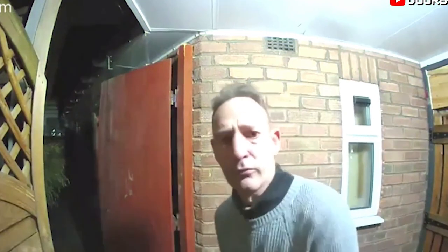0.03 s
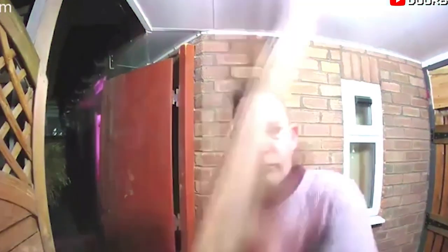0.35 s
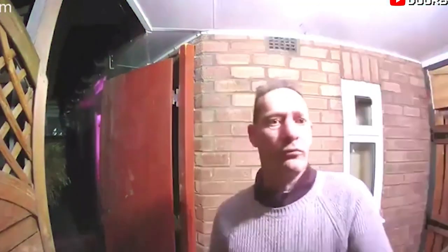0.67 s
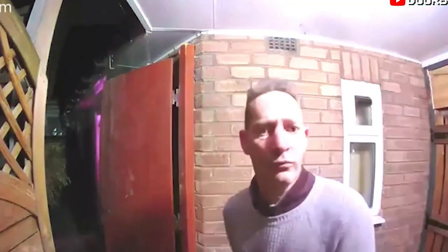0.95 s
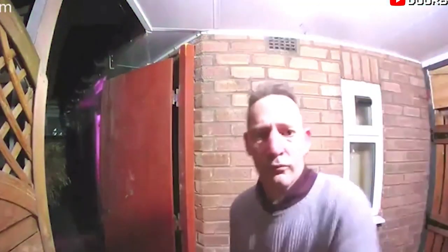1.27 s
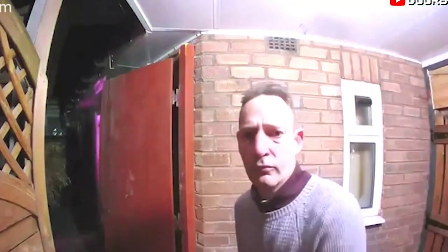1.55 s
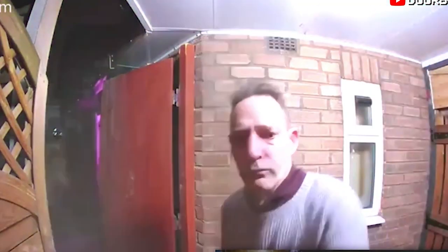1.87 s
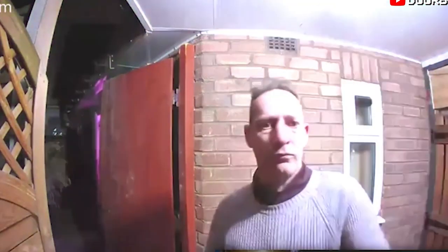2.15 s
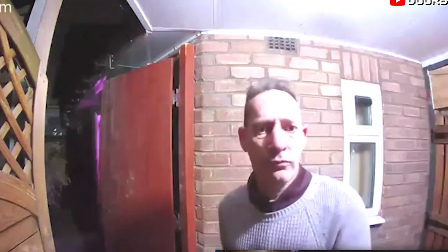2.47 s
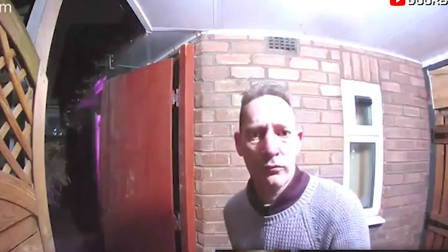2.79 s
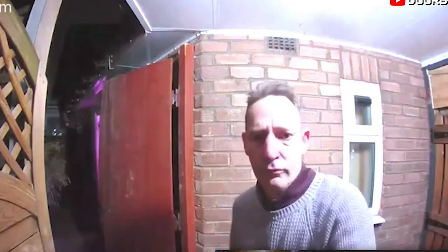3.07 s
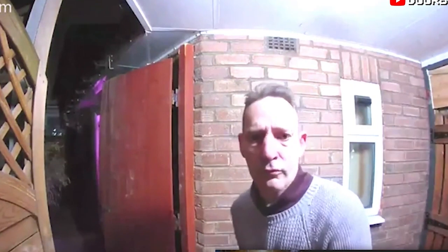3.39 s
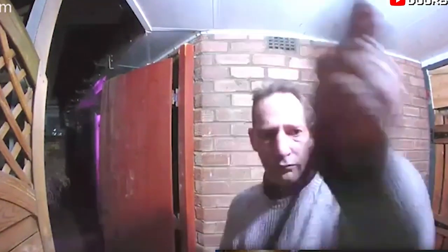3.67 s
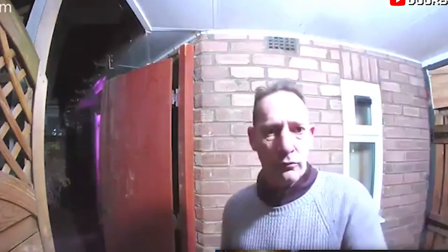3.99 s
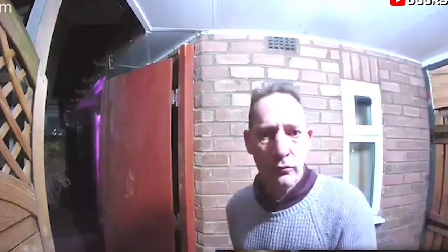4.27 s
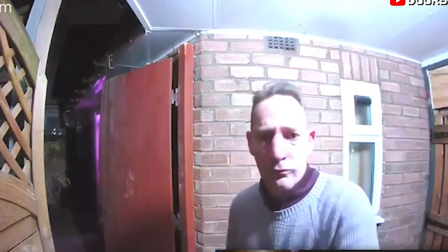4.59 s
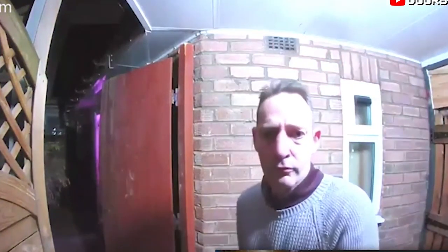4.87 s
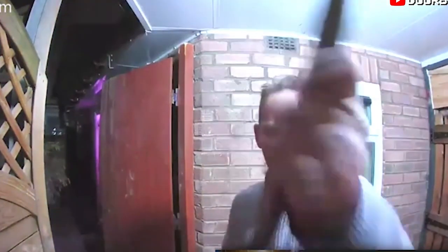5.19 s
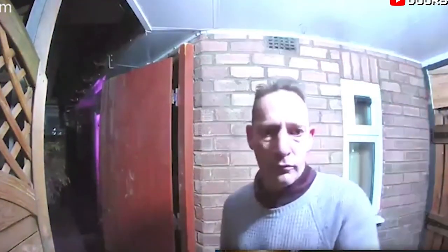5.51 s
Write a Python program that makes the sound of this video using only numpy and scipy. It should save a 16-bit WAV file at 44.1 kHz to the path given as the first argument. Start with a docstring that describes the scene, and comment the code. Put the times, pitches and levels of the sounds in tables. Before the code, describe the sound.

A hand strikes a doorbell camera seven times at uneven intervals on an outdoor porch. Each blow is a sharp plastic knock with a short ring from the mount, and some add a low panel thud. Between blows the loose housing clicks, the hand scrapes and raps, a small metal part buzzes and a sleeve swishes softly. The microphone sits inside the housing and overloads on the hits, over a faint hiss.

```python
"""A man's hand strikes a doorbell camera seven times, under a brick porch at night.
Each blow swings the plastic housing, rings its mount and overloads the tiny microphone inside.
Heavy blows make the panel behind it thud, and a small metal part buzzes when shaken.
Between blows the loose housing clicks, his hand scrapes and raps on it, and his sleeve swishes
over a faint outdoor hiss."""
import sys
import numpy as np
from scipy import signal
from scipy.fft import rfft, irfft, next_fast_len
from scipy.io import wavfile
from scipy.ndimage import uniform_filter1d

SR = 44100
rng = np.random.default_rng(int(sys.argv[2]) if len(sys.argv) > 2 else 0)


def pcm_store(signal):
    """Save signal as 16-bit PCM."""
    levels = np.round(np.clip(np.atleast_2d(signal), -1, 1) * 32767)
    wavfile.write(sys.argv[1], SR, levels.astype(np.int16).T)


N = 249165
T = np.arange(round(.7 * SR)) / SR  # seconds since the start of one short sound

# A mode is one tone an object rings with. decay_s is the time a sound takes to fade by 60 dB.
# A spot is the place touched on the housing; spot_hz is the pitch that place brings out.

# tone of the outdoor hiss: pitch_hz, level_db
NIGHT_TONE = [(15, -48.5), (25, -22), (38, -13), (146, -4), (255, -7), (285, -6), (319, -9), (436, -9),
              (487, -7.5), (533, -9.5), (652, -11), (1040, -11), (2490, -26), (4650, -18), (5200, -27.5),
              (6760, -55), (11400, -120)]
# the sleeve swings past: middle_s, level_db
SLEEVE_SWISHES = [(0.04, -49), (0.235, -39), (1.39, -31), (1.775, -40), (1.98, -41), (2.06, -39),
                  (2.815, -49.5), (3.11, -45), (3.43, -48), (4.19, -48), (4.375, -39), (5.01, -39.5)]
# tone of the sleeve: pitch_hz, level_db
SLEEVE_TONE = [(200, -4), (900, -7), (2000, -15.5), (3000, -5), (3700, -4.5), (4500, 3), (5200, -9.5),
               (6500, -16.5)]
# clicks of the loose housing: start_s, level_db, spot_hz
HOUSING_CLICKS = [ (0.164, -34.5, 2800), (0.204, -30.5, 3020), (0.4456, -2.5, 900), (0.4738, -13, 3860),
                  (0.5051, -8.5, 1290), (0.5235, -9, 1400), (0.5636, -10, 3500), (1.166, -18, 4040),
                  (2.902, -3, 4060), (3.014, -1, 1550), (3.033, -11, 2780), (3.0406, 1.5, 1600),
                  (3.0441, -0.5, 860), (3.157, -25.5, 1730), (3.213, -33, 2800), (3.41, -31, 2600),
                  (4.468, 1, 3930), (4.5169, -4.5, 830), (4.5567, -1.5, 1580), (4.5635, 1.5, 850),
                  (4.5744, -5.5, 862), (4.642, -27, 4100), (4.656, -23, 4130), (4.6750, -11, 4050),
                  (4.737, -33, 4480), (4.7586, -11.5, 3420), (4.7609, -11, 1620)]
# modes of the housing's plastic shell: pitch_hz, level_db, decay_s
SHELL_MODES = [(810, 0, 0.0083), (945, -8, 0.023), (1550, -6.5, 0.013), (1653, -6.5, 0.018),
               (2106, -4.5, 0.013), (2800, -4.5, 0.01), (3420, -8, 0.028), (4390, 0, 0.006),
               (4480, 1.5, 0.0087), (4900, -7.5, 0.0098)]
# tone of the porch echo, also used for the snap of a click: pitch_hz, level_db
PORCH_TONE = [(150, -14.5), (800, 7.5), (2500, -7), (4400, -1.5), (5500, -4), (9000, -9.5)]
# the hand lands; the housing rocks and its face flexes, at pitches set by the grip:
# start_s, weight_db, hardness_db, thump_db, mount_db, decay_s, rock_hz, rock_db, flex_hz, flex_db
HAND_BLOWS = [ (0.2824, -9.5, -5, -16.5, -11.5, 0.31, 432, -9, 787, -4),
              (1.2380, -7.5, -16.5, -23, -6, 0.35, 289, 4, 1102, 2.5),
              (1.8400, -3, -9, -7, -15, 0.16, 458, 12.5, 754, 13),
              (2.8661, -7.5, -12, -11, -8, 0.31, 387.3, 11.5, 700, -11.5),
              (2.8870, -20.5, -13, -39.5, -29, 0.17, 300, -13.5, 782, 15),
              (3.4890, -9.5, -11, -23, -11, 0.24, 448.4, 14, 749, 8.5),
              (4.4217, -11, -7.5, -20, -7.5, 0.31, 293, -4.5, 752, -0.5),
              (5.0620, -16.5, -8, -22, -13, 0.24, 402, 5.5, 706, 3.5),
              (5.0840, -16, -27.5, -31, -14, 0.13, 399, -3.5, 756, -12.5)]
# tone of the clatter after a blow: pitch_hz, level_db
CLATTER_TONE = [(40, -25), (80, -14.5), (130, -10), (170, -2), (205, -6), (300, 2.5), (460, -2), (600, -4),
                (800, -3), (1100, -2), (1500, -5.5), (2600, -10), (4400, -4), (5500, -14.5), (7000, -10),
                (11000, -9)]
# pitch ranges of the clatter, starting with the palm's thump: low_hz, high_hz
CLATTER_BANDS = [(45, 130), (130, 600), (600, 1500), (1500, 3300), (3300, 11000)]
# what drives each range above the thump (hardness sets the rest): level_db, weight_share
BAND_DRIVE = [(-1.5, 1), (1, 0.68), (-2.5, 0.26), (3.5, 0.22)]
# modes of the mount: pitch_hz, level_db, decay_s
MOUNT_MODES = [(296.3, -9, 0.34), (316, 0.5, 0.27), (399.2, -5, 0.3), (444, -5, 0.22), (751.7, -0.5, 0.11),
               (871, -12.5, 0.2), (1022, -17, 0.29), (1040, -22.5, 0.076), (4070, -16, .14),
               (4290, -21, 0.093)]
# the panel hits its frame: start_s, level_db
PANEL_THUDS = [(0.340, -16.5), (1.28, -7), (2.911, -3.5), (4.475, -8.5)]
# modes of the panel: pitch_hz, level_db, decay_s
PANEL_MODES = [(172.9, -4.5, 0.24), (200, -7.5, 0.12), (261.6, -7, 0.26), (335, -1.5, 0.1)]
# the hand drags on the housing: spot_hz, list of (time_s, level_db)
HAND_SCRAPES = [(1300, [(0.43, -38), (0.465, -25.5), (0.50, -33), (0.53, -28.5), (0.578, -26.5)]),
                (4450, [(4.52, -28.5), (4.535, -19.5), (4.56, -13), (4.59, -17.5), (4.615, -23),
                (4.628, -41)])]
# light knuckle raps: start_s, hardness_db, decay_s, flex_hz, flex_db
KNUCKLE_RAPS = [(0.5796, -6.5, .12, 1928, 0.5), (0.5971, -16, 0.29, 1927, -4.5),
                (1.1298, -16, 0.37, 2972, 1.5)]
# the small metal part is shaken: start_s, level_db, decay_s
METAL_BUZZES = [(1.13, -6, 0.09), (1.149, -17, 0.34), (1.416, -28, 0.12), (1.485, -33.5, 0.13)]
# modes of the metal part: pitch_hz, level_db, decay_s
METAL_MODES = [(2890, -7.5, 0.095), (2970, -6, 0.12), (3030, -12.5, 0.045), (3070, -6.5, 0.047),
               (3040, -5, 0.01), (4550, 7.5, 0.016)]
# the microphone jams for a moment: start_s, end_s, gain_db, rebound_db
MIC_JAMS = [(1.857, 1.8913, -29.5, -5), (5.0715, 5.0793, -14.5, -4)]
# air pushed ahead of the palm: middle_s, level_db
AIR_PUFFS = [(5.046, -34.5)]
# tone of that air: pitch_hz, level_db
PUFF_TONE = [(50, -1), (300, 17), (1000, 10.5), (2000, -1.5), (5000, -40.5)]
# tone of the thin, bright sizzle above 5 kHz on loud hits: pitch_hz, gain_db
SIZZLE_TONE = [(4000, -20.5), (6000, -10.5), (7500, -7.5), (8800, -14.5), (11500, -17.5), (13000, -35.5)]
# overall tone, even across low and middle pitches: pitch_hz, gain_db
FLAT_RANGE = [(50, 0), (4000, 0)]
# overall tone, uneven across high pitches: pitch_hz, gain_db
TREBLE_TONE = [(5000, -2), (6000, 3), (7500, -6), (8800, -13), (11500, -10.5), (12600, -23), (15500, -17.5)]


def amp(db):
    """Turns decibels into a number to multiply by."""
    return 10 ** (np.asarray(db) / 20)


def unit(x):
    """Scales a sound to an average (rms) level of 1."""
    return x / np.sqrt(np.mean(x ** 2) + 1e-20)


def add(mix, start_s, sound):
    """Adds a sound to the mix at the given time."""
    part = mix[max(round(start_s * SR), 0):][:len(sound)]
    part += sound[:len(part)]


def colour(x, tone):
    """Turns each pitch up or down along a curve of pitch_hz, gain_db."""
    hz, db = np.transpose(tone)
    size = next_fast_len(len(x) + 4096)
    bins_hz = np.fft.rfftfreq(size, 1 / SR)
    gain = amp(np.interp(np.log(bins_hz + 1), np.log(hz + 1), db))
    return irfft(rfft(x, size) * gain, size)[:len(x)]


def noise(tone, size):
    """Noise with the given tone, at an average level of 1."""
    return unit(colour(rng.standard_normal(size), tone))


def lowpass(x, hz, size):
    """Cuts away the pitches above hz without delaying the sound."""
    return signal.oaconvolve(x, signal.firwin(size, hz, window="blackman", fs=SR), "same")


def fade(decay_s):
    """A level that starts at 1 and dies away."""
    return np.exp(-np.log(1000) * T / max(decay_s, 1e-3))


def rise(rise_s):
    """A level that climbs from 0 towards 1."""
    return 1 - np.exp(-T / rise_s)


def ring(modes, scatter_db, detune, decay_scale=1):
    """A struck object rings: each mode gets a random strength, sign and slight shift in pitch."""
    out = np.zeros(len(T))
    for hz, db, decay_s in modes:
        shift, strength, side = rng.standard_normal(3)
        wave = np.sign(side) * np.sin(2 * np.pi * hz * (1 + detune * shift) * T)
        out += amp(db + scatter_db * strength) * fade(decay_s * decay_scale) * wave
    return out


def swells(events, tone, length_s):
    """Noise that swells and sinks softly once for each event."""
    level = np.zeros(N)
    arch = np.sin(np.linspace(0, np.pi, round(length_s * SR)))
    for middle_s, db in events:
        add(level, middle_s - length_s / 2, amp(db) * arch)
    return level * noise(tone, N)


def night_hiss(level_db=-47.5):
    """The faint, steady hiss of the outdoors."""
    return amp(level_db) * noise(NIGHT_TONE, N)


def sleeve_swishes():
    """The sleeve swishes as the arm swings past."""
    return swells(SLEEVE_SWISHES, SLEEVE_TONE, length_s=0.11)


def click(spot_hz, decay_scale=1, spot_boost_db=8, spot_octaves=.17):
    """Plastic snaps against plastic and the shell rings briefly, most of all near the spot's pitch."""
    boosted = [(hz, db + spot_boost_db * np.exp(-(np.log2(hz / spot_hz) / spot_octaves) ** 2), decay_s)
               for hz, db, decay_s in SHELL_MODES]
    shell = ring(boosted, scatter_db=2.0, detune=0.027, decay_scale=decay_scale)
    snap = amp(-6) * noise(PORCH_TONE, len(T)) * fade(0.036 * decay_scale)
    contact = (shell + snap) * rise(0.00037)
    tilt_db = 7.5 * np.log2(spot_hz / 1400)  # stiffer spots ring higher and brighter
    tone = [(300, -16), (750, -tilt_db / 2), (1200, -tilt_db / 2), (4200, tilt_db / 2)]
    return amp(-2.5) * colour(contact, tone)


def housing_clicks(echo_db=-34.5, echo_decay_s=.28):
    """The loose housing clicks with a faint porch echo; a dragging hand cuts its ringing short."""
    out = np.zeros(N)
    for start_s, db, spot_hz in HOUSING_CLICKS:
        held = any(curve[0][0] < start_s < curve[-1][0] for _, curve in HAND_SCRAPES)
        echo = amp(echo_db) * noise(PORCH_TONE, len(T)) * fade(echo_decay_s)
        direct = click(spot_hz, decay_scale=0.49 if held else 1)
        add(out, start_s, amp(db) * (direct + echo))
    return out


def clatter(levels_db, decay_s):
    """Countless modes of wall, fittings and porch die away together; the deepest last a bit longer."""
    out = np.zeros(len(T))
    for k, (band, db) in enumerate(zip(CLATTER_BANDS, levels_db)):
        band_filter = signal.butter(4, band, "band", fs=SR, output="sos")
        wash = signal.sosfilt(band_filter, noise(CLATTER_TONE, 2 * len(T)))[-len(T):]
        decay = fade(decay_s * (1.32 if k == 0 else 1))
        out += amp(db) * unit(wash * decay) / unit(decay).max()
    return out


def impact(weight_db, hardness_db, thump_db, decay_s, swings, wobble_hz=45):
    """One hit swings the housing; weight mostly drives the low clatter, hardness the high clatter."""
    grip = unit(uniform_filter1d(rng.standard_normal(len(T)), size=150))  # makes the pitch unsteady
    swing = sum(amp(db) * np.sin(2 * np.pi * np.cumsum(hz + wobble_hz * grip) / SR) for hz, db in swings)
    swing *= fade(.3 * decay_s)  # dies sooner than the clatter
    upper_db = [db + share * weight_db + (1 - share) * hardness_db for db, share in BAND_DRIVE]
    landing = 1 + fade(0.15)  # the clatter is strongest while the hand lands
    return (swing + landing * clatter([thump_db] + upper_db, decay_s)) * rise(0.0008)


def hand_blows(snap_hz=3170, rebound_s=.018):
    """Each blow rings the mount; the housing snaps against its stop, and again as it springs back."""
    out = np.zeros(N)
    for (start_s, weight_db, hardness_db, thump_db, mount_db, decay_s,
         rock_hz, rock_db, flex_hz, flex_db) in HAND_BLOWS:
        swings = [(rock_hz, rock_db), (flex_hz, flex_db)]
        add(out, start_s, impact(weight_db, hardness_db, thump_db, decay_s, swings))
        add(out, start_s, amp(mount_db) * ring(MOUNT_MODES, scatter_db=-0.5, detune=0.012))
        snap_db = rock_db - 7  # harder rocking makes a louder snap
        add(out, start_s, amp(snap_db) * click(snap_hz))
        add(out, start_s + rebound_s, amp(snap_db - 0.5) * click(snap_hz))
    return out


def panel_thuds():
    """After heavy blows the panel behind the camera thuds against its frame."""
    out = np.zeros(N)
    for start_s, db in PANEL_THUDS:
        thud = ring(PANEL_MODES, scatter_db=-2.0, detune=0.026) * rise(0.0027)
        add(out, start_s, amp(db) * thud)
    return out


def hand_scrapes(slips_per_s=1400, uneven_db=4, click_kinds=6):
    """The hand drags in many tiny slips of uneven size, each one a click of the shell."""
    out = np.zeros(N)
    shape = (click_kinds, N)
    for spot_hz, curve in HAND_SCRAPES:
        times_s, levels_db = np.transpose(curve)
        t = np.arange(times_s[0], times_s[-1], 1 / SR)
        sizes = rng.choice([-1, 1], shape) * amp(uneven_db * rng.uniform(-2.57, 2, shape))
        slips = sizes * (rng.random(shape) < slips_per_s / click_kinds / SR)
        scrape = sum(signal.fftconvolve(row[:len(t)], click(spot_hz, decay_scale=.9)) for row in slips)
        level = amp(np.interp(t, times_s, levels_db))
        add(out, times_s[0], level * unit(scrape[:len(t)]))
    return out


def knuckle_raps(weight_db=-32, thump_db=-42):
    """A light rap flexes the housing's face without rocking it, and snaps the shell once."""
    out = np.zeros(N)
    for start_s, hardness_db, decay_s, flex_hz, flex_db in KNUCKLE_RAPS:
        add(out, start_s, impact(weight_db, hardness_db, thump_db, decay_s, [(flex_hz, flex_db)]))
        add(out, start_s, amp(-9) * click(spot_hz=4800, decay_scale=0.75))
    return out


def metal_buzzes():
    """A small metal part chatters on its seat, which makes its ringing rough."""
    out = np.zeros(N)
    for start_s, db, decay_s in METAL_BUZZES:
        chatter = rng.standard_normal(2 * len(T) - 1)
        buzz = signal.fftconvolve(chatter, ring(METAL_MODES, scatter_db=6.0, detune=0.003), "valid")
        level = fade(decay_s) * rise(0.002)
        add(out, start_s, amp(db) * unit(buzz * level) / unit(level).max())
    return out


def microphone_jams(x, rebound_hz=62, rebound_decay_s=0.059):
    """At the listed overloads the microphone goes nearly dead and swings slowly back to rest."""
    gain, rebound = np.ones(N), np.zeros(N)
    swing = fade(rebound_decay_s) * np.cos(2 * np.pi * rebound_hz * T)
    for start_s, end_s, gain_db, rebound_db in MIC_JAMS:
        gain[round(start_s * SR):round(end_s * SR)] = amp(gain_db)
        add(rebound, start_s, amp(rebound_db) * swing)
    return x * lowpass(gain, hz=400, size=81) + lowpass(rebound, hz=400, size=81)


def air_puff():
    """The palm pushes a puff of air ahead of it just before the last blow."""
    return swells(AIR_PUFFS, PUFF_TONE, length_s=0.073)


def scene():
    """Everything that reaches the microphone, as one channel."""
    background = night_hiss()
    arm = sleeve_swishes() + air_puff()
    hits = hand_blows() + knuckle_raps()
    loose_parts = panel_thuds() + metal_buzzes() + housing_clicks()
    return (background + arm + hits + loose_parts + hand_scrapes())[None]


def record(dry, headroom=1.4, clip_level=.89, sizzle_threshold_db=-12, hiss_db=-81):
    """Loud hits have a thin, bright sizzle and quiet sounds stay dull; blows overload the microphone."""
    muffled = lowpass(dry[0], hz=5260, size=301)
    sizzle = colour(dry[0] - muffled, SIZZLE_TONE)
    power = uniform_filter1d(muffled ** 2, round(0.017 * SR))  # averaged over 17 ms
    sizzle_gain = power ** 2 / (power ** 2 + amp(sizzle_threshold_db) ** 4)
    x = muffled + sizzle_gain * sizzle
    x = headroom * np.tanh(x / headroom) / clip_level  # the microphone squashes peaks softly
    x = clip_level * x / (1 + x ** 10) ** (1 / 10)  # the amplifier clips them hard
    x = microphone_jams(x)
    x += amp(hiss_db) * rng.standard_normal(N)  # faint hiss of the electronics
    x = colour(x, FLAT_RANGE + TREBLE_TONE)
    return lowpass(x, hz=15850, size=401)[None]


dry = scene()
out = record(dry)
pcm_store(out)
```